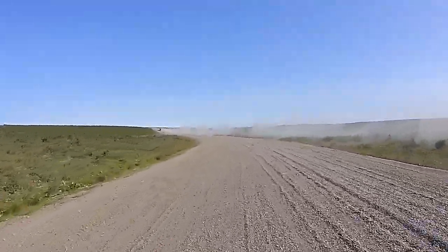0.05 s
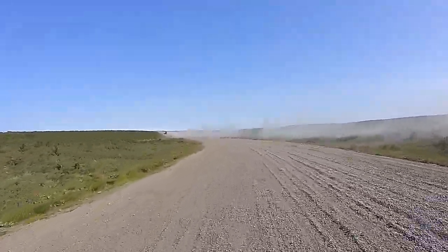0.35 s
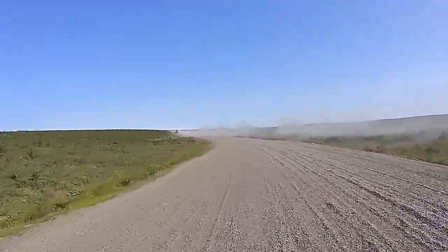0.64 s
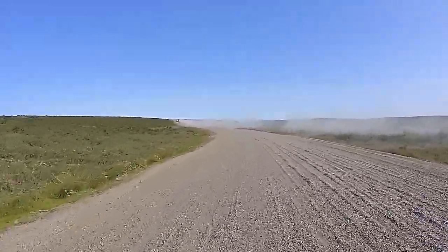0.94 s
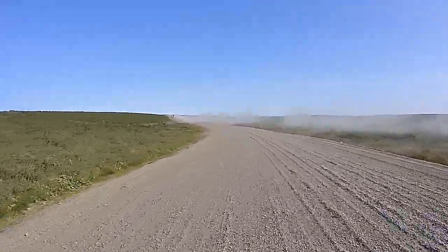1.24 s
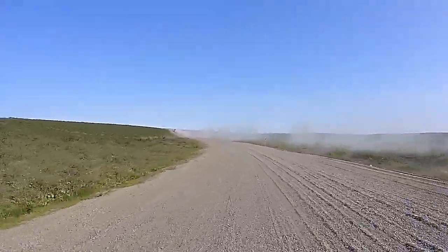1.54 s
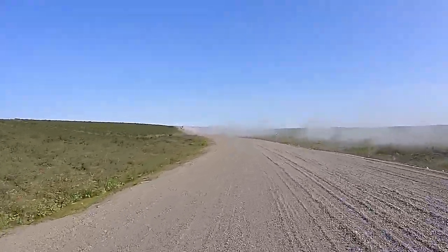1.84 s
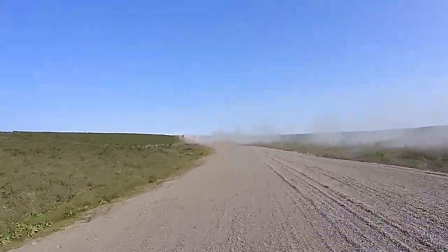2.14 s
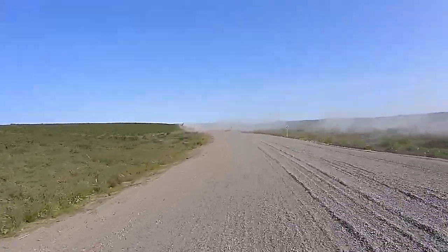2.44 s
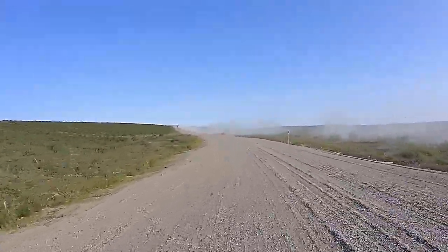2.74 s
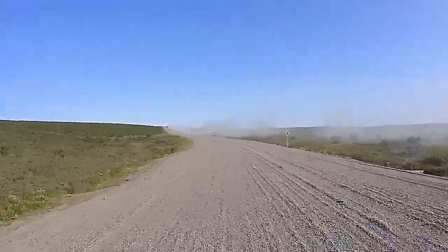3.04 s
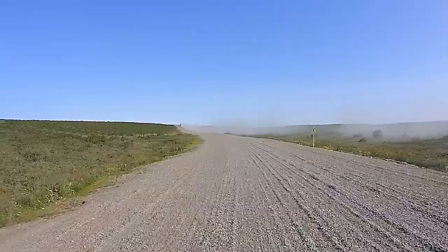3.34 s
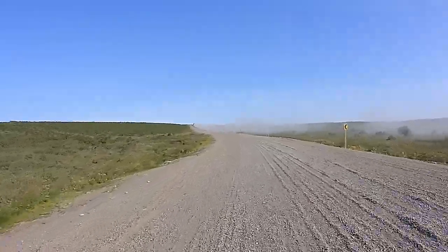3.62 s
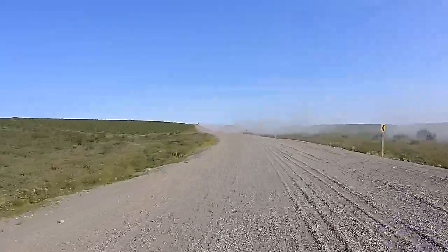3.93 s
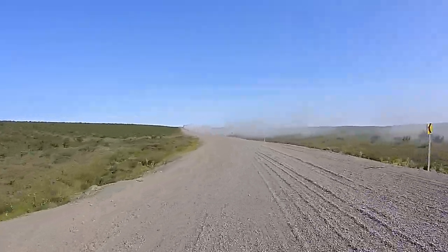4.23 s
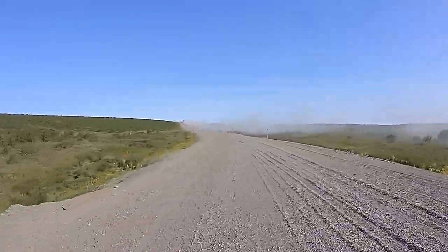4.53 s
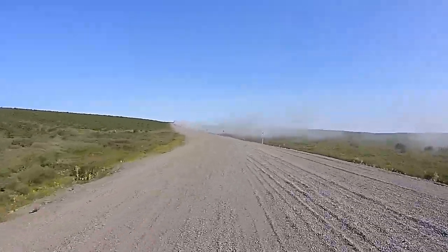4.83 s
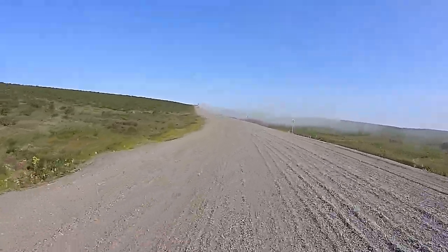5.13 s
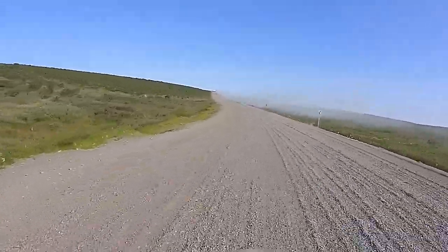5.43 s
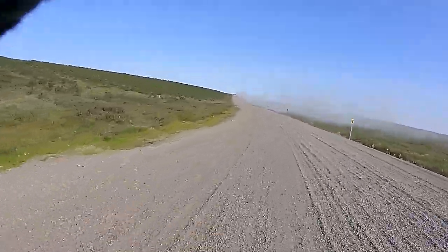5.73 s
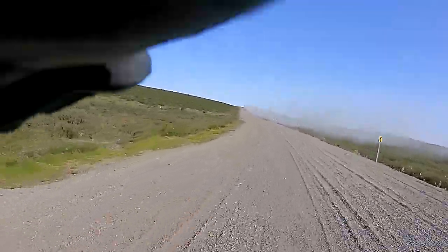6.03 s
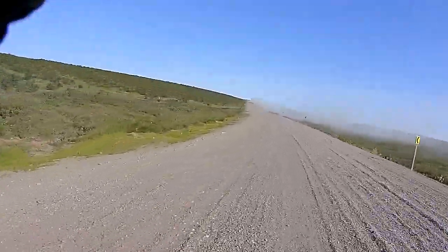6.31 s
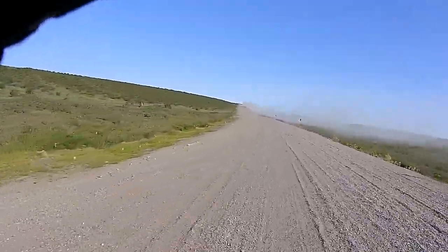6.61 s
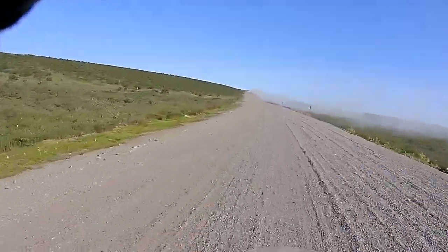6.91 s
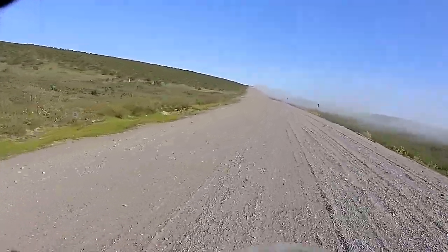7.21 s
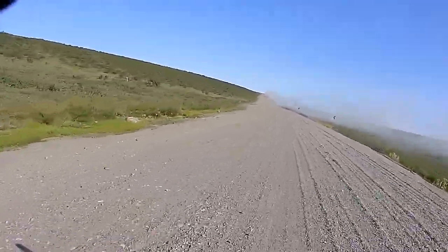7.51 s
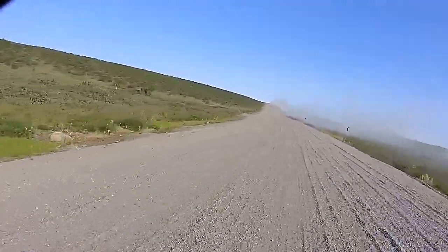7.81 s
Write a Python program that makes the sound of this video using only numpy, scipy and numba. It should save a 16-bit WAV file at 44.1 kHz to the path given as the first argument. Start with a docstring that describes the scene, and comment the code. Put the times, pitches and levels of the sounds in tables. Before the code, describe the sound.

Crackling wind buffets a helmet over faint motorcycle and gravel noise, until the visor snaps closed and the rush falls to a quiet hiss.

```python
"""Helmet wind, visor shut

A motorcycle runs along a gravel road, heard from a microphone in the rider's open helmet.
The slipstream crackles, cracks and whistles at the visor's edge over a faint engine and tyre rumble.
A glove comes up and shields the opening, the visor clicks and snaps shut; a soft hollow hiss is left."""
import sys
import numpy as np
from scipy import signal
from scipy.fft import rfft, irfft, next_fast_len
from scipy.io import wavfile
from numba import njit

SR = 44100
rng = np.random.default_rng(int(sys.argv[2]) if len(sys.argv) > 2 else 0)


def to_wav(sig):
    """Store sig (one row per channel, or 1-D mono) as 16-bit WAV at the path in sys.argv[1].

    Samples outside -1..1 are clipped; the rate is SR.
    """
    pcm = np.clip(np.atleast_2d(sig), -1, 1) * 32767
    pcm = np.round(pcm).astype(np.int16)
    wavfile.write(sys.argv[1], SR, pcm.T)  # frames by channels


N = 346626
T = np.arange(N) / SR

# slipstream at the helmet before any shielding, steady between lulls: (time [s], level [dB])
SLIPSTREAM_LEVEL = [(0, -28), (.18, -31), (.36, -28.1), (1.23, -28), (1.56, -32.6), (1.63, -29.6),
                    (2.17, -28.2), (2.23, -30.3), (2.4, -27.6), (2.91, -28.5), (3.08, -36), (3.27, -28.2),
                    (4.09, -26.6), (4.31, -30.7), (4.41, -27.3), (4.57, -32.5), (4.7, -31.8), (4.83, -39.8),
                    (5.11, -28.7), (5.66, -27.7)]
# the glove shields, air spills in past the moving visor, then it seals: (time [s], gain [dB])
SHIELDING = [(5.685, -0.5), (5.715, -12.5), (5.81, -25), (5.99, -25), (6.07, -14), (6.09, -6), (6.21, -7),
             (6.29, -22), (6.36, -44)]
# how freely the air reaches the microphone: (time [s], share [0-1])
OPENNESS = [(5.68, 0.92), (5.8, 0.03)]
# tone of strong air and of slack air: (frequency [Hz], gain [dB])
STRONG_AIR_EQ = [(180, -49), (300, -26.5), (517, -27), (1350, -12), (1640, -12), (2520, -2.5), (3510, 2),
                 (6250, -11.5), (8700, -29.5), (10400, -45), (11500, -38), (14500, -44.5), (15500, -64)]
SLACK_AIR_EQ = [(290, -57), (500, -34.5), (1240, -14), (1600, -15.5), (2760, -1), (4190, 1.5), (4980, -3),
                (5830, -5), (7030, -11), (9110, -24), (10400, -38.5), (12000, -29.5), (15500, -39)]
# the hardest air cracks: (time [s], crack [dB], thump [dB], brightness [0-1], second snap delay [s])
BIG_CRACKS = [(.053, -21, -38, .45, .0004), (.0962, -24, -36.5, .85, 0.0021),
              (.3445, -23.5, -43, 0.46, .0004), (.612, -23, -44, .4, .0004),
              (1.2338, -24.5, -47, 0.95, .0004), (1.7936, -16, -22, 0.04, .0033),
              (1.8878, -20, -39, .6, .0004), (2.1674, -16.5, -35.5, 0.6, 0.0018),
              (2.4289, -18.5, -52, 0.17, .0004), (2.4708, -20, -31, .1, 0.0038),
              (2.6089, -16.5, -26.5, .12, 0.0017), (2.6318, -26, -38, .85, .0004),
              (2.8881, -23, -38, .6, .0004), (3.1853, -27.5, -39.5, 0.55, .0004),
              (3.3477, -24.5, -41, .05, .0004), (3.7832, -11.5, -29.5, .15, .0068),
              (3.8063, -20, -44, 0.4, .0004), (4.0885, -14.5, -27, .3, 0.0038),
              (4.1199, -21.5, -45, 0.6, .0004), (5.0852, -19, -32, 1, .0004),
              (5.4611, -20.5, -39, 1, .0004), (5.5918, -25.5, -37, 0.15, .0004)]
# tone of a dull crack, a bright crack and the thump beneath: (frequency [Hz], gain [dB])
DULL_CRACK_EQ = [(600, -28.5), (1500, -2.5), (2700, 2.5), (3800, 2.5), (6500, -15.5), (10300, -50),
                 (11500, -51), (15500, -42)]
BRIGHT_CRACK_EQ = [(600, -22), (1500, -10.5), (2800, 4.5), (4200, 0), (6500, -4.5), (8500, -17),
                   (10300, -33), (11500, -31), (15500, -36)]
THUMP_EQ = [(30, -13), (90, -4.5), (290, 3), (480, 1), (900, 6.5), (1400, 8), (2400, -50.5)]
# edge tones in slackening air: (time [s], length [s], start pitch [Hz], level [dB], waver [share])
EDGE_TONES = [(.14, .18, 4230, -45, .005), (1.27, .3, 4280, -41.5, .004), (2.98, 0.23, 4255, -44, 0.0066),
              (4.519, .54, 4370, -42, 0.0035), (5.76, .16, 3950, -46.5, .024)]
# the visor's ratchet and the glove on its rim: (time [s], click [dB], thump [dB], decay [s])
VISOR_CLICKS = [(5.976, -35.5, -67, 0.0043), (6.015, -34, -70, .0089), (6.089, -35, -62, .009),
                (6.112, -29, -64, .001), (6.197, -34, -48, .0034), (6.21, -29, -35, .004),
                (6.3168, -41.5, -40, .013), (6.688, -56, -60, .066), (7.1265, -50.5, -56, .0013)]
# tone of the visor's plastic: (frequency [Hz], gain [dB])
PLASTIC_EQ = [(600, -25), (1400, -8.5), (2600, -3.5), (4000, -0.5), (6500, -9.5), (10300, -34),
              (12000, -37), (15500, -36)]
# air round the raised glove, and eddies off the dropping arm: (time [s], centre [Hz], level [dB])
GLOVE_WAKE = [(6.17, 450, -72), (6.21, 450, -37), (6.3, 600, -50.5), (6.5, 720, -51), (6.59, 1140, -50.5),
              (6.7, 680, -54), (6.85, 500, -81)]
ARM_EDDIES = [(6.15, 260, -75), (6.31, 130, -58), (6.38, 245, -63), (6.75, 225, -68.5), (7.0, 160, -61.5),
              (7.17, 130, -77)]
# tone of grit on the shell: (frequency [Hz], gain [dB])
GRIT_EQ = [(2000, -10), (5000, 0), (8000, -2), (10400, -19), (12000, -21), (15500, -29)]
# the bed of road and air: (time [s], rumble [dB], gravel wash [dB], shell hiss [dB])
RIDE_LEVELS = [(0, -65.5, -57.5, -84), (5.6, -65.5, -53, -70), (6.3, -65, -53.5, -67),
               (6.75, -64, -66, -57), (7.0, -66, -75, -56), (7.86, -68.5, -85, -61)]
# tone of tyres and machine, of the gravel wash and of the helmet's hollow: (frequency [Hz], gain [dB])
RUMBLE_EQ = [(20, -4), (45, -3.5), (70, 5), (100, -1.5), (180, 1.5), (260, -5.5), (370, -14), (700, -30),
             (1500, -37)]
GRAVEL_EQ = [(70, -15.5), (160, 0), (300, -10), (380, -2), (500, 3), (700, -4), (1300, 2.5), (1750, 1.5),
             (2500, 2.5), (4000, -2.5), (7000, -6.5), (10000, -23)]
HOLLOW_EQ = [(350, -18), (500, -1.5), (630, -12.5), (1080, -14), (1380, 0), (1680, -1), (2000, -8),
             (2400, -9), (2950, -0.5), (3600, -10), (4300, -12), (5200, -18), (7000, -18.5), (10000, -33),
             (15000, -52)]
# engine gaining speed, quieter once the visor is shut: (time [s], pitch [Hz], level [dB])
ENGINE_NOTE = [(0, 229.5, -66), (3.3, 242, -67), (6.1, 247.7, -67), (6.5, 249.4, -76), (7.86, 252, -83)]


def slipstream(slack_db=-38, strong_db=-29, hiss_db=-6, grit_db=-28, flutter_db=.86, sway_db=.15):
    """Turbulence is a dense rain of snaps over a hiss; strong, free air is rougher and reaches lower."""
    level_db = flow_db()
    strength = np.clip((level_db - slack_db) / (strong_db - slack_db), 0, 1)
    force = curves(OPENNESS)[0] * strength
    crackle = unit(snaps(patter(per_s=1900, spread_db=4.5), swell_s=.0008, tick_share=.35))
    air = crackle + undb(hiss_db - 5 * force) * noise()
    air = unit(air * undb(flutter_db * wobble(180) + sway_db * wobble(7.6)))
    strong = colour(air, STRONG_AIR_EQ) + undb(grit_db) * grit()
    slack = colour(air, SLACK_AIR_EQ)
    return undb(level_db) * (force * strong + (1 - force) * slack)


def flow_db():
    """Level of the air that gets past glove and visor."""
    return curves(SLIPSTREAM_LEVEL)[0] + curves(SHIELDING)[0]


def limiter_duck(after_s=.011, width_s=.0051, full_duck_thump_db=-20.5):
    """The wind's level dips briefly after each big crack, like a limiter; heavier thumps duck deeper."""
    times, _, thump_db, _, _ = np.transpose(BIG_CRACKS)
    depths = np.minimum(undb(thump_db - full_duck_thump_db), 1)
    gain = np.ones(N)
    for centre, depth in zip(times + after_s, depths):
        near = np.abs(T - centre) < 2 * width_s
        gain[near] *= 1 - depth * np.exp(-((T[near] - centre) / width_s) ** 2)
    return gain


def air_cracks():
    """Eddies break on the microphone: each a sharp crack with a dull thump under it."""
    times, crack_db, thump_db, brightness = np.vstack([small_eddies(), big_eddies()]).T
    at = (times * SR).astype(int)
    tick_scale = np.sqrt(.003 * SR)  # one tick holds the energy of 3 ms at its level
    dull_ticks, bright_ticks, thump_ticks = np.zeros((3, N))
    dull_ticks[at] = tick_scale * undb(crack_db) * np.sqrt(1 - brightness)
    bright_ticks[at] = tick_scale * undb(crack_db) * np.sqrt(brightness)
    thump_ticks[at] = tick_scale * undb(thump_db) * np.sign(noise()[at])  # pressure jumps up or down
    dull = colour(snaps(dull_ticks, swell_s=.0004, tick_share=.22), DULL_CRACK_EQ)
    bright = colour(snaps(bright_ticks, swell_s=.00083, tick_share=.081), BRIGHT_CRACK_EQ)
    thump = colour(snaps(thump_ticks, swell_s=.0008, tick_share=.75), THUMP_EQ)
    return dull + bright + thump


def big_eddies(second_snap_db=-4, rebound_s=.017, rebound_db=-11):
    """Two snaps and a weak rebound per eddy: (time [s], crack [dB], thump [dB], brightness [0-1])."""
    times, crack_db, thump_db, brightness, delay = np.transpose(BIG_CRACKS)
    first = (times, crack_db, thump_db, brightness)
    second = (times + delay, crack_db + second_snap_db, thump_db + second_snap_db, brightness)
    rebound = (times + rebound_s, thump_db + rebound_db, thump_db + rebound_db, brightness)
    return np.hstack([first, second, rebound]).T


def small_eddies(per_s=9, crack_gain_db=.5, thump_gain_db=-18, spread_db=.5):
    """Lesser eddies break at random in free air, as hard as it blows; columns as in big_eddies."""
    at = np.flatnonzero(rng.random(N) < per_s * curves(OPENNESS)[0] / SR)
    level_db = (flow_db() + spread_db * np.minimum(noise(), 1))[at]
    brightness = .9 * rng.random(N)[at]
    return np.column_stack((T[at], level_db + crack_gain_db, level_db + thump_gain_db, brightness))


def snaps(ticks, swell_s, tick_share):
    """Each tick ends a short swell of noise: an eddy builds up, then tears off."""
    pole = np.exp(-1 / (swell_s * SR))
    swell_power = signal.lfilter([1 - pole], [1, -pole], ticks[::-1] ** 2 + 1e-18)[::-1]
    return np.sqrt(tick_share) * ticks + np.sqrt((1 - tick_share) * swell_power) * noise()


def edge_whistle(sag_hz_per_s=360, swell_db_per_s=9, fade_s=.037, flutter_db=2.3):
    """The visor's edge sings an unsteady tone that swells as its pitch sags, then breaks off."""
    out = np.zeros(N)
    jitter = wobble(250)
    flutter = unit(undb(flutter_db * wobble(60)))
    for start, length, hz, db, waver in EDGE_TONES:
        on = (T > start) & (T < start + length)
        age = T[on] - start
        pitch = (hz - sag_hz_per_s * age) * (1 + waver * jitter[on])
        fade = np.minimum(np.minimum(age, length - age) / fade_s, 1)
        gain = fade * flutter[on] * undb(db - swell_db_per_s * (length - age))
        out[on] += gain * np.sqrt(2) * np.sin(2 * np.pi * np.cumsum(pitch) / SR)
    return out


def visor():
    """The visor ticks over its ratchet, slaps on the seal and settles."""
    times, click_db, thump_db, decays = np.vstack([VISOR_CLICKS, seal_slap()]).T
    return bursts(times, click_db, decays, PLASTIC_EQ) + bursts(times, thump_db, decays, THUMP_EQ)


def seal_slap(start_s=6.2305, gap_s=.0088, click_db=-18.5, loss_db=3.5, thump_db=-37.5, decay_s=.0069):
    """The visor chatters on its seal, clicking softer at each bounce; columns as in VISOR_CLICKS."""
    return [(start_s + k * gap_s, click_db - k * loss_db, thump_db, decay_s) for k in range(4)]


def swirl(path, damping, flutter_db):
    """Air shed from a moving glove or arm: a fluttering, swept band of noise."""
    hz, db = curves(path)
    band = bandpass(noise(), hz, damping)
    air = bandpass(band, hz, damping) / np.sqrt(hz)  # even power across the sweep
    return undb(db) * unit(air * undb(flutter_db * wobble(40)))


def grit():
    """Specks of grit tick on the shell."""
    return colour(unit(patter(per_s=40, spread_db=3)), GRIT_EQ)


def ride_bed(bump_db=2, wash_flutter_db=1, hiss_flutter_db=.5):
    """Tyres rumble and hiss on the gravel; air sliding past the shell rings the helmet's hollow."""
    rumble_db, wash_db, hiss_db = curves(RIDE_LEVELS)
    rumble = colour(unit(noise() * undb(bump_db * wobble(4.9))), RUMBLE_EQ)
    wash = colour(unit(noise() * undb(wash_flutter_db * wobble(60))), GRAVEL_EQ)
    hiss = colour(unit(noise() * undb(hiss_flutter_db * wobble(30))), HOLLOW_EQ)
    return undb(rumble_db) * rumble + undb(wash_db) * wash + undb(hiss_db) * hiss


def engine(waver=.0031):
    """One thin, slightly wavering engine note."""
    hz, db = curves(ENGINE_NOTE)
    pitch = hz * (1 + waver * wobble(17))
    return undb(db) * unit(np.sin(2 * np.pi * np.cumsum(pitch) / SR))


def bursts(times, levels_db, decays, eq, rise_s=.00021):
    """Short noise hits of one tone colour; each level is the rms of the first 3 ms."""
    out, source = np.zeros(N), colour(noise(), eq)
    head = int(.003 * SR)
    for time, db, decay in zip(times, levels_db, decays):
        start = int(time * SR)
        age = T[:min(N - start, SR // 5)]
        span = slice(start, start + len(age))
        burst = source[span] * (1 - np.exp(-age / rise_s)) * np.exp(-age / decay)
        out[span] += undb(db) * burst / np.sqrt(np.mean(burst[:head] ** 2))
    return out


def patter(per_s, spread_db):
    """Ticks at random moments, of either sign and uneven size."""
    ticks = (rng.random(N) < per_s / SR) * np.sign(noise())
    return ticks * undb(spread_db * np.minimum(noise(), 2.5))


def colour(x, eq, size=4096):
    """Minimum-phase EQ through (frequency [Hz], gain [dB]) points; white noise keeps its power."""
    hz, db = np.transpose(eq)
    grid_hz = np.maximum(np.arange(size // 2 + 1) * SR / size, 1)
    gain = undb(np.interp(np.log(grid_hz), np.log(hz), db))
    cepstrum = irfft(np.log(gain))
    cepstrum[1:size // 2] *= 2  # folded forward, so nothing rings ahead of a hit
    cepstrum[size // 2 + 1:] = 0
    response = irfft(np.exp(rfft(cepstrum)))
    return signal.fftconvolve(x, response / np.linalg.norm(response))[:N]


@njit
def bandpass(x, hz, damping):
    """Band-pass with a moving centre; damping is width over centre."""
    y, band, low = np.empty(len(x)), 0., 0.
    for i in range(len(x)):
        g = np.tan(np.pi * hz[i] / SR)
        y[i] = (band + g * (x[i] - low)) / (1 + g * (g + damping))
        band, low = 2 * y[i] - band, low + 2 * g * y[i]
    return y


def wobble(rate_hz):
    """Smooth random modulation at rms 1, rolling off above rate_hz."""
    size = next_fast_len(N, real=True)
    hz = np.arange(size // 2 + 1) * SR / size
    spectrum = rfft(noise(), size) * np.exp(-(hz / rate_hz) ** 2)
    return unit(irfft(spectrum, size)[:N])


def curves(table):
    """Each column after the time as an automation curve."""
    times, *columns = np.transpose(table)
    return [np.interp(T, times, column) for column in columns]


def noise():
    """White noise."""
    return rng.standard_normal(N)


def undb(db):
    """Decibels to gain."""
    return 10 ** (np.asarray(db) / 20)


def unit(x):
    """Scale to rms 1."""
    return x / np.sqrt(np.mean(x ** 2))


def scene():
    """Air, visor and machine mixed at one microphone."""
    glove = swirl(GLOVE_WAKE, damping=1.73, flutter_db=1.2)
    arm = swirl(ARM_EDDIES, damping=.72, flutter_db=1.5)
    wind = slipstream() * limiter_duck() + air_cracks() + edge_whistle()
    bed = engine() + ride_bed()
    return (wind + visor() + glove + arm + bed)[None]


def record(dry):
    """Soft clipping rounds the loudest peaks and a steep low-pass cuts the top."""
    ceiling, top_hz = .85, 15400
    rounded = ceiling * np.tanh(dry / ceiling)
    return signal.sosfilt(signal.ellip(8, .2, 70, top_hz, fs=SR, output="sos"), rounded)


dry = scene()
out = record(dry)
to_wav(out)
```